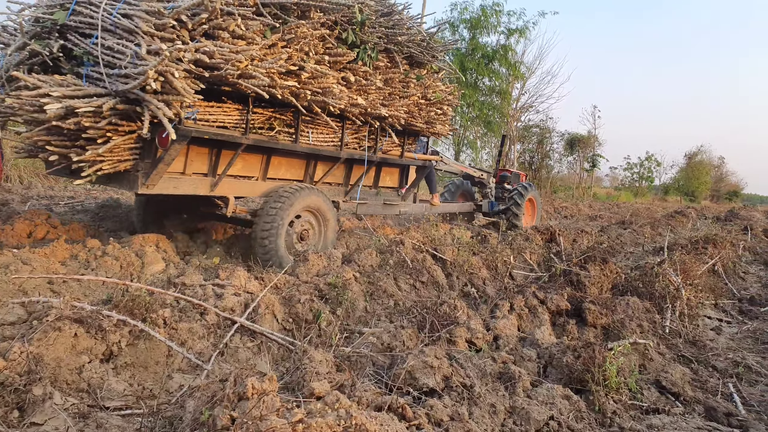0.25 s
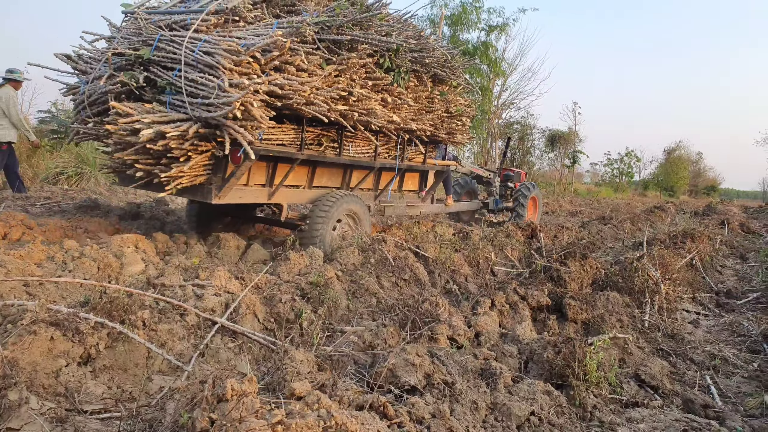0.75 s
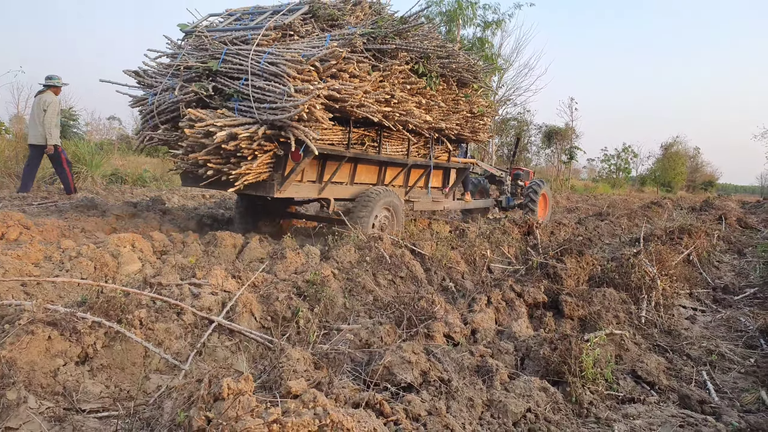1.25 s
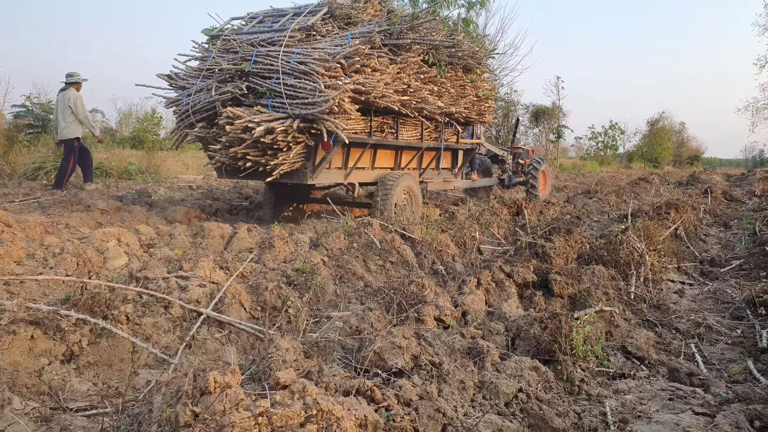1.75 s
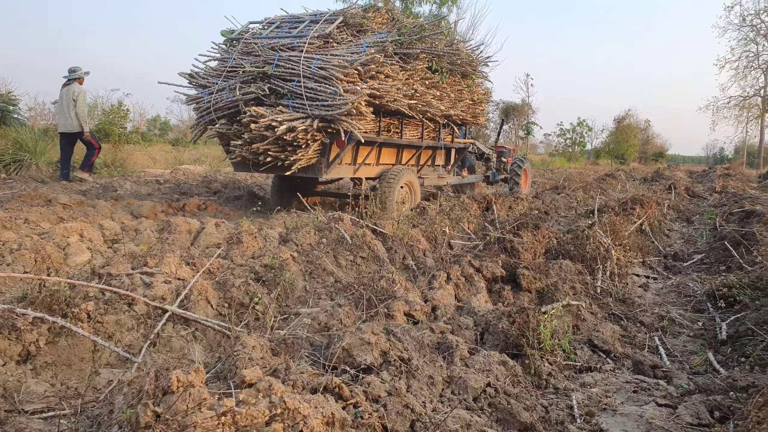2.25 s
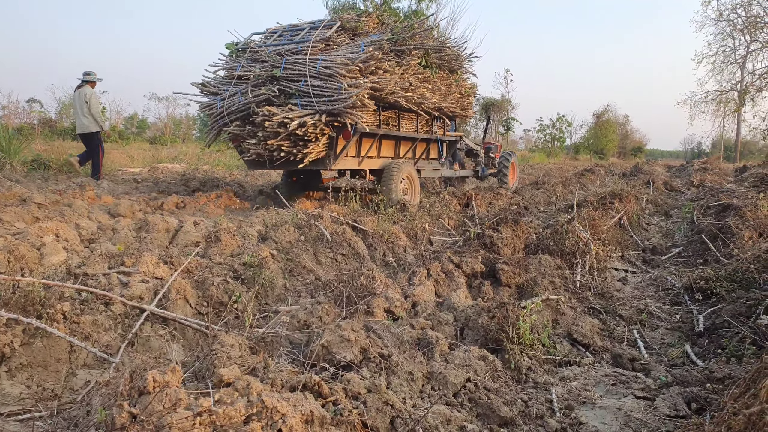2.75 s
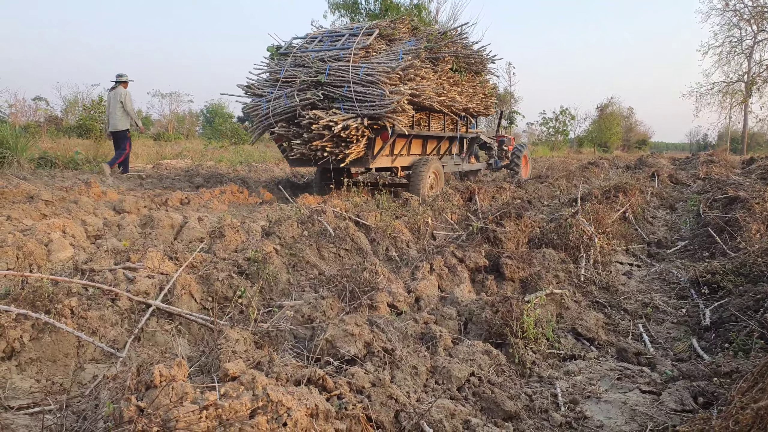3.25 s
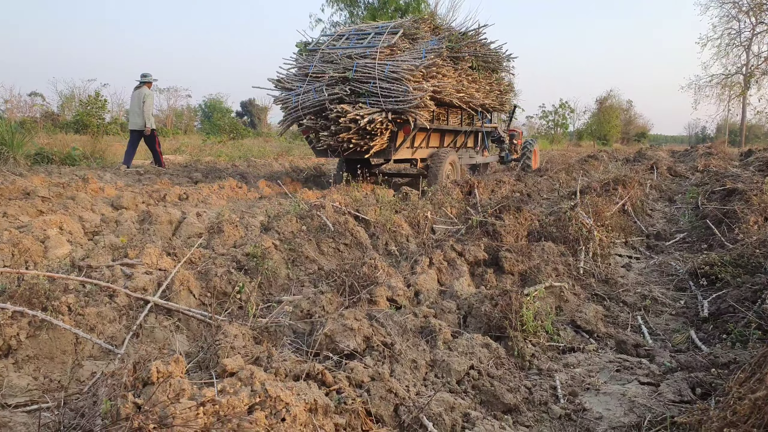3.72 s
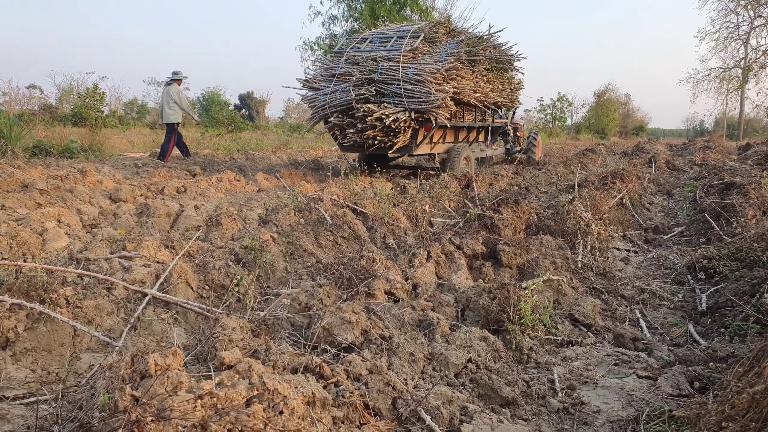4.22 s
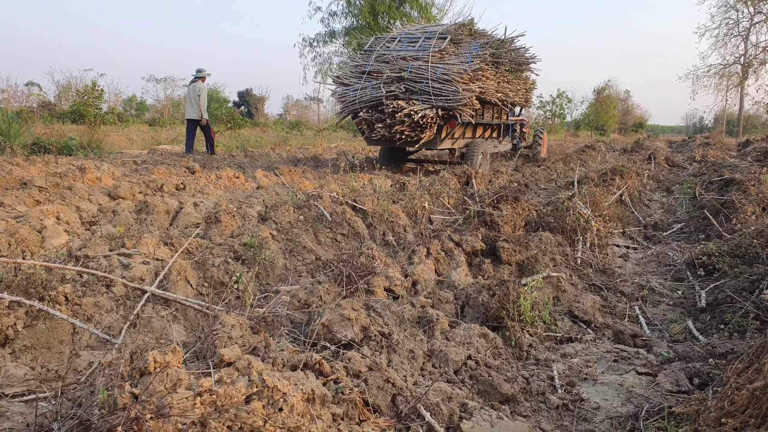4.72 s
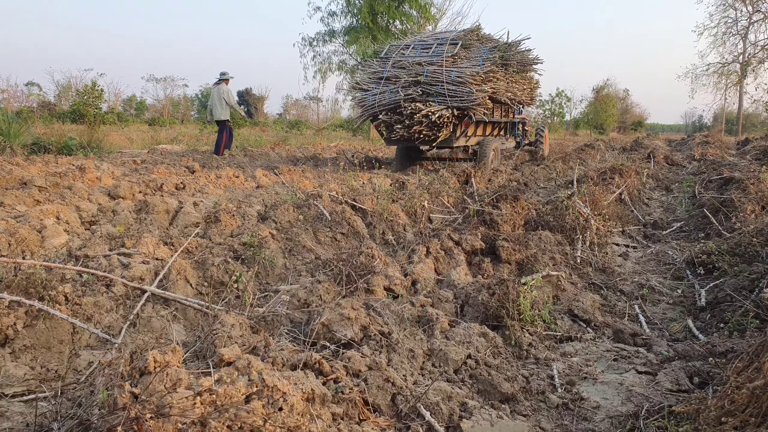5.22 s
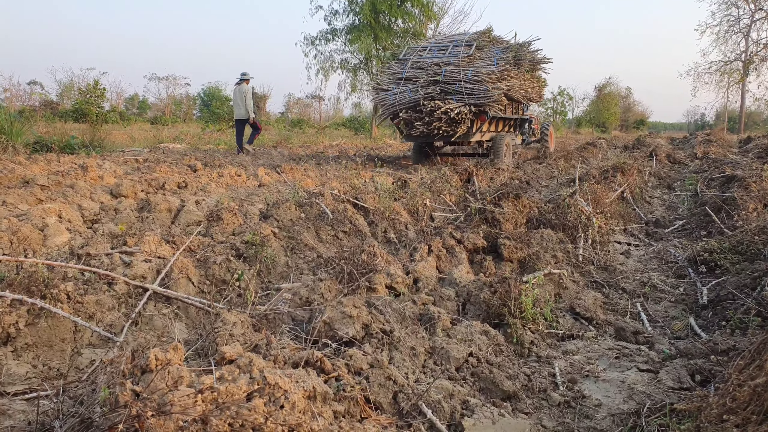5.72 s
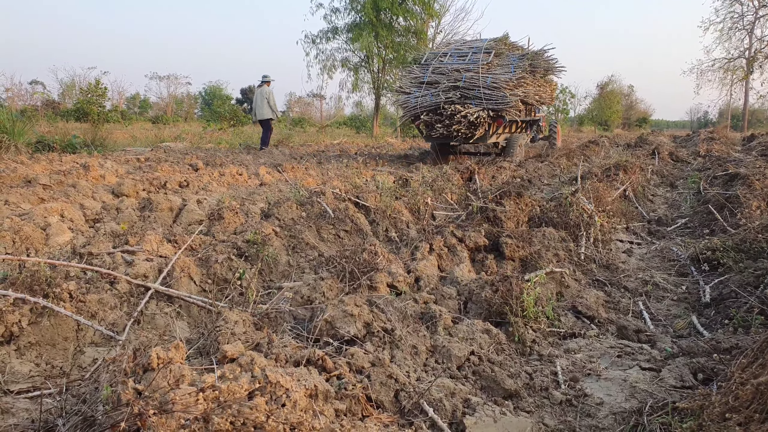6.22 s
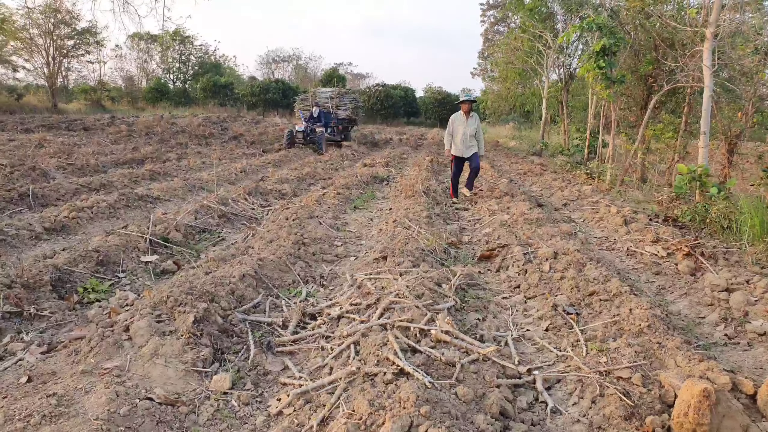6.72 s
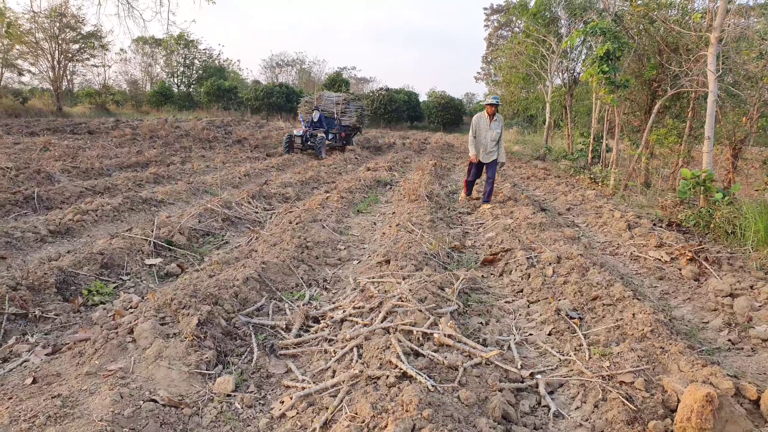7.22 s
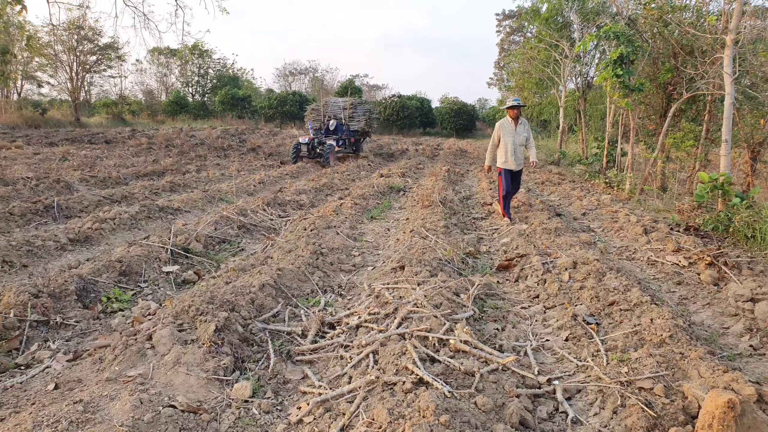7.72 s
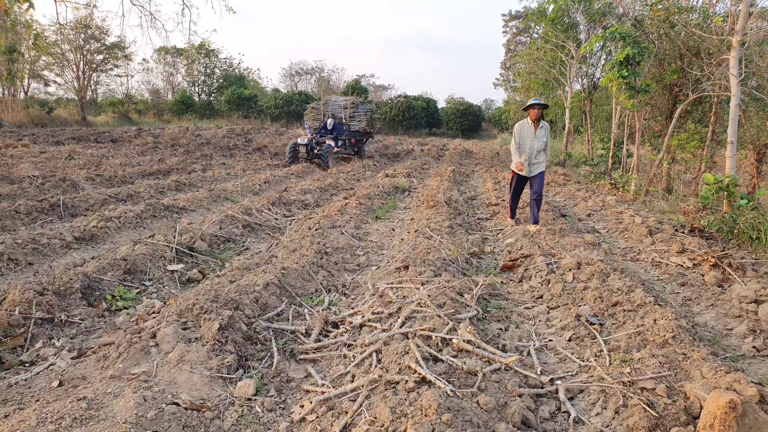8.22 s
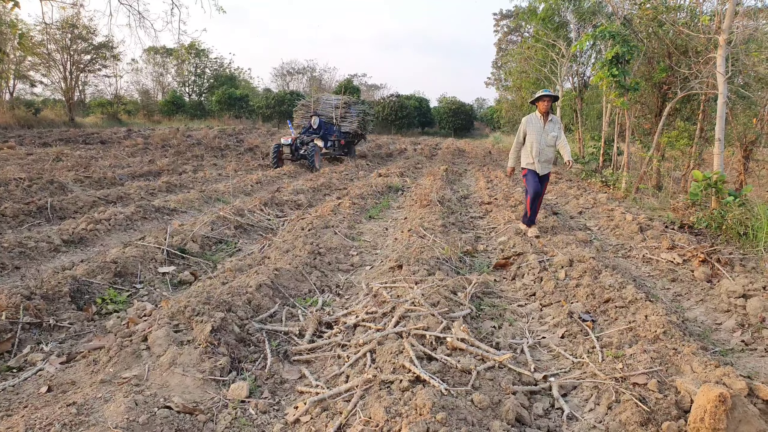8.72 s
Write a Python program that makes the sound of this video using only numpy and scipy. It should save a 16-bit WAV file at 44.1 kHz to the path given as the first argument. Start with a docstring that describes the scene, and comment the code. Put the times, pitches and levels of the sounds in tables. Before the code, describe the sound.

A single-cylinder diesel hand tractor coasts with clacking valves, then pulls hard with loud thumping exhaust and gear whine, before cutting to slower knocking from the front.

```python
"""Diesel hand tractor on ploughed ground

A single-cylinder hand tractor drags a loaded trailer: from behind it coasts, then pulls and moves off, with gears
singing; after a cut it is heard from the front, turning slower. Each engine cycle knocks, blasts into the exhaust
pipe, clacks its valves and leaves the pipe booming. Blows are shaped noise with ringing casing modes; the pipe,
panels and gears are sines; clatter and rumble are coloured noise. Two microphone ports hear it all.
Paired tables hold (behind, front), and view 0 or 1 picks one."""
import sys
import numpy as np
from scipy import signal
from scipy.fft import rfft, irfft, next_fast_len
from scipy.io import wavfile
from scipy.ndimage import map_coordinates

SR = 44100
rng = np.random.default_rng(int(sys.argv[2]) if len(sys.argv) > 2 else 0)


def boost(x):
    """Linear amplitude factor 10**(x/20) for a level x in decibels (scalar or array-like)."""
    u = np.asarray(x, float) / 20
    return 10 ** u


def wav_out(sig):
    """Save sig, one row per channel (or a flat mono array), as 16-bit PCM at SR to the path in sys.argv[1]."""
    wavfile.write(sys.argv[1], SR, np.round(np.clip(np.atleast_2d(sig).T, -1, 1) * 32767).astype(np.int16))


N = 395136  # samples

CUT_S = 6.712  # the listening place jumps from behind to in front
GRIT_DB = 2  # roughness of noise levels
HISS_FROM_HZ = 400  # low edge of the engine's noises
SCATTER_DB = .9  # cycle-to-cycle spread of the main blows


def along(points, hz):
    """Interpolate (Hz, value) points on a log frequency axis."""
    f, v = np.transpose(points)
    return np.interp(np.log(hz + 1), np.log(f + 1), v)


def read(rows, when):
    """Each column after the time, at the given moments."""
    s, *cols = np.transpose(rows)
    return [np.interp(when, s, c) for c in cols]


def wobble(rate):
    """A smooth random curve, rate knots a second."""
    knots = rng.standard_normal(int(N * rate / SR) + 4)
    return map_coordinates(knots, [np.arange(N) * rate / SR])


def lay(starts, shapes):
    """Add each row of shapes into the timeline at its start (s)."""
    # a second of margin at the front holds cycles that begin before time zero
    at = np.round(starts * SR).astype(int)[:, None] + np.arange(shapes.shape[1]) + SR
    return np.bincount(at.ravel(), shapes.ravel(), N + 3 * SR)[SR:SR + N]


# left-right balance of the microphone ports: (frequency [Hz], left over right [dB])
PORT_BALANCE = ([(60, 0.0), (92, 0.0), (140, 0.2), (210, -1.0), (330, -3.5), (500, -1.0), (770, -0.5),
                 (1170, -5.5), (1790, -8.0), (2740, -7.0), (4190, -11.0), (6410, -5.5), (9810, -3.0),
                 (15000, -8.0)], [(60, 0.0), (92, 0.0), (140, 0.0), (210, 0.0), (330, 1.0), (500, -2.0),
                 (770, 0.5), (1170, -2.5), (1790, 1.2), (2740, -3.5), (4190, -8.5), (6410, -8.0),
                 (9810, -4.0), (15000, -5.0)])
# phase between the ports: (frequency [Hz], left leads by [radians])
PORT_LEADS = ([(30, -0.13), (100, -0.13), (200, -0.25), (310, -0.5), (430, 0), (700, -0.2), (780, -0.5),
               (1210, -1.8), (1890, -2.1), (2500, -1.3), (2840, -2.6), (3270, -2.9), (3620, -2.2),
               (4390, -2.9), (5510, -2.6), (7670, -3.6), (8350, -2.5), (11500, -6.2), (16200, -6.8)],
               [(0, 0), (350, 0), (430, -0.4), (540, 0.45), (1120, 0.3), (1460, 1.3), (2670, 0.1),
               (2930, 0.7), (5940, 2.9), (7320, 5.4), (8530, 2.9), (9650, 5.3), (12500, 6.5), (13400, 8.8),
               (14000, 14.8), (15800, 24.3), (16200, 25.3)])
# likeness of noise at the two ports: (frequency [Hz], shared part [0-1])
PORT_SHARED = [(100, .995), (600, .94), (2000, .84), (5000, .74), (12000, .62)]


def ports(a, b, colour, view):
    """Two draws of a sound reach the ports unequal, shifted and partly shared; the ports' mean keeps its level."""
    size = next_fast_len(N + 8192)
    hz = np.fft.rfftfreq(size, 1 / SR)
    a, b = rfft([a, b], size)
    turn = np.arccos(np.clip(along(PORT_SHARED, hz), 0, 1)) / 2
    common, apart = np.cos(turn), np.sin(turn)
    lead = np.interp(hz, *np.transpose(PORT_LEADS[view]))
    # half the difference goes to the left, the opposite half to the right
    port = boost(along(PORT_BALANCE[view], hz) / 2) * np.exp(.5j * lead)
    mean_power = np.abs(common * (port + 1 / port) / 2) ** 2 + np.abs(apart * (port - 1 / port) / 2) ** 2
    pair = [port * (common * a + apart * b), (common * a - apart * b) / port]
    return irfft(colour(hz) / np.sqrt(mean_power) * pair, size)[:, :N]


def hiss(envelope, spectrum, view, from_hz):
    """Noise under an envelope, coloured behind a steep low cut; the colour has an rms gain of 1."""
    def colour(hz):
        """The spectrum with its low cut, levelled."""
        gain = boost(along(spectrum, hz)) / (1 + (from_hz / (hz + 1)) ** 8)
        return gain / np.sqrt(np.mean(gain ** 2))
    return ports(*envelope * rng.standard_normal((2, N)), colour, view)


def struck(modes, levels_db, detune):
    """Rows of dying modes (Hz, t60), one row a blow, each mode at its own strength and pitch offset."""
    t = np.arange(SR // 8) / SR
    hz, t60 = np.transpose(modes)
    out = np.zeros((len(levels_db), len(t)))
    for k in range(len(hz)):
        fade = boost(levels_db[:, [k]] - 60 * t / t60[k])
        out += fade * np.sin(2 * np.pi * hz[k] * (1 + detune[:, [k]]) * t)
    return out * (1 - np.exp(-t / 0.0029))  # soft onset


# engine speed, as the moments of every sixth valve change behind, every fourth in front: (time [s])
VALVE_CHANGES = (([-0.361, 0.0046, 0.3888, 0.7967, 1.2186, 1.6627, 2.1146, 2.5589, 2.9869, 3.4037, 3.814,
                  4.2227, 4.6193, 5.0079, 5.389, 5.7668, 6.1419, 6.5075, 6.8745], [6.272, 6.6848, 7.1024,
                  7.5199, 7.9455, 8.3629, 8.774, 9.178, 9.575]))
# engine cycles between those moments: [cycles]
CYCLES_APART = (6, 4)


def cycle_times(view):
    """The moment of every valve change, on a smooth curve through the marked ones."""
    s = np.array(VALVE_CHANGES[view])
    place = np.arange((len(s) - 1) * CYCLES_APART[view] + 1) / CYCLES_APART[view]

    def steady(k):
        """The moments if the engine turned evenly."""
        return s[0] + (s[-1] - s[0]) * k / (len(s) - 1)
    drift = s - steady(np.arange(len(s)))
    return map_coordinates(drift, [place], mode="nearest") + steady(place)


# what the engine does: (time [s], load [0-1], far or screened by the trailer [0-1])
DRIVE = (([(.05, .3, 0), (.25, .1, 0), (.74, 0.06, 0.1), (1, 0, 0.16), (1.45, 0, 0.07), (1.6, 0.73, 0),
          (1.76, 0.93, 0), (2.3, 0.97, 0.02), (2.55, 1, 0.03), (2.95, 1, 0.01), (3.3, 0.93, 0.1),
          (3.8, 0.94, 0.15), (4.15, 1, 0), (4.45, 0.98, 0.41), (5, 1, 0.4), (5.5, 0.98, 0.67), (6, 1, 0.73),
          (6.4, 0.87, 0.86), (6.7, 0.95, 0.7)], [(6.75, 0.33, 0.88), (7.3, 0.43, 0.38), (7.8, 0.71, 0.23),
          (8.4, 0.6, 0.3), (8.96, 0.98, 0)]))
# engine speed at which the laws need no correction: [cycles a second]
USUAL_SPEED = (14.5, 9.5)


def obey(laws, view, times):
    """Each law's value at every cycle, from load, speed and hiding."""
    load, hidden = read(DRIVE[view], times)
    faster = 1 / np.gradient(times) - USUAL_SPEED[view]
    return [light + (full - light) * load + per_speed * faster + cover * hidden
            for light, full, per_speed, cover in laws[view]]


# cycles that stand out, by a louder blast or, early on while coasting, a louder valve clack;
# before each sound takes its share: (time [s], extra level [dB])
STRONG_CYCLES = [(.13, 2.5), (.195, 3), (.26, 2.5), (.325, 3), (.59, 2), (.73, 2.5), (2.04, 3), (2.115, 2),
                 (2.34, 2.5), (2.485, 1), (2.56, 2), (2.63, 2), (2.705, 3), (2.775, 3), (2.845, 2),
                 (2.915, 0.5), (3.055, 0.5), (3.405, 2), (3.68, 2), (3.745, 3), (4.02, 1), (4.085, 2),
                 (4.88, 2), (4.945, 2), (5.07, 3.5), (5.77, 1), (6.79, 3), (7.63, 3), (7.84, 2.5),
                 (8.26, 2), (8.77, 2.5)]


def standing_out(times):
    """Extra dB of each cycle: each marked moment goes to the cycle nearest it."""
    s, extra_db = np.transpose(STRONG_CYCLES)
    gap = np.abs(times[:, None] - s)
    nearest = (gap == gap.min(axis=0)) & (gap < np.gradient(times)[:, None])
    return nearest @ extra_db


# laws, each (light load, full load, change per extra cycle a second, change when hidden)
# blowdown driving the open pipe, rows: lead [ms], pipe pitch [Hz], boom [dB], pressure front [dB]
EXHAUST = (([(23, 13, -0.45, -1.3), (67.5, 87.5, 2, 3), (-19, -7.5, 1, -4.5), (-33, -18, 0, -22)],
            [(17, 18.5, -.1, 0.2), (78, 74.5, .1, -2), (-16, -12, .1, -2), (-30, -21, .1, -12)]))
# pipe once the valve shuts, rows: lag [ms], ring pitch [Hz], ring [dB], swell [0-1], t60 [s], snap [dB]
SHUT = (([(8.5, 8, -0.0032, 0.4), (89.5, 93, 0.64, 2), (-5, -7.5, .5, 2.7), (.85, -0.4, -.15, 2.24),
         (.16, 0.1558, -.015, 0.085), (-14.5, -21, 0.09, -10)], [(6.5, 6.5, .1, 0.9), (101, 97, .1, 4.5),
         (-11, -9.5, .1, -5), (.15, 0.24, .01, 0.65), (.16, .17, .01, -.02), (-50, -52, .1, 18)]))
EXTRA_IN_PIPE = 0.32  # share of a strong cycle's extra dB in boom and ring, twice that in the snap


def pipe(view, times):
    """The blowdown swings the open pipe; the shutting valve snaps and restarts it at another pitch."""
    lead, pipe_hz, boom_db, front_db = np.array(obey(EXHAUST, view, times))[..., None]
    lag, ring_hz, ring_db, swell, t60, snap_db = np.array(obey(SHUT, view, times))[..., None]
    extra_db = EXTRA_IN_PIPE * standing_out(times)[:, None]
    t = np.arange(-SR // 32, SR // 4) / SR
    opened, closed = t + lead / 1000, t - lag / 1000  # s since the valve opened, shut
    shut = .5 + .5 * np.tanh(closed / .0014)
    build = 1 - np.exp(-np.maximum(opened, 0) / 0.0036)
    boom = -np.sin(2 * np.pi * pipe_hz * opened) * build * (1 - shut)
    front = np.maximum(opened + 0.0036, 0) / 0.0015
    after = np.maximum(closed, 0)
    swelling = 1 - np.clip(swell, 0, 1) * np.exp(-after / .012)
    fade = swelling * boost(-60 * after / np.maximum(t60, .05))
    ring = np.sin(2 * np.pi * ring_hz * closed + 2.3) * shut * fade
    snap = (closed - TIMING[view][5] / 1000) / 0.00093
    wave = boost(boom_db + extra_db) * boom + boost(front_db) * front * np.exp(1 - front)
    wave += boost(ring_db + extra_db) * ring
    wave -= boost(snap_db + 2 * extra_db) * snap * np.exp(.5 - snap ** 2 / 2)
    return lay(times + t[0], wave)


# higher pipe modes: (frequency [Hz], opening level over boom [dB], shutting level over ring [dB], t60 [s])
OVERTONES = (([(168.7, -12.5, -15.5, 0.071), (208.7, -20, -17, 0.073), (257, -18.5, -17, 0.05),
              (319.5, -17.5, -25, 0.055)], [(156, -21.5, -20, 0.078), (217, -17.5, -7.5, 0.048),
              (253, -37, -9.5, 0.06), (397.5, -23.5, -43, 0.17)]))


def overtones(view, times):
    """Both valve movements kick the pipe's higher modes at the same pitch every cycle, so they stay pitched."""
    lead, _, boom_db, _ = obey(EXHAUST, view, times)
    lag, _, ring_db, *_ = obey(SHUT, view, times)
    hz, open_db, shut_db, t60 = np.transpose(OVERTONES[view])
    modes = np.transpose([hz, t60])
    chance_db = rng.standard_normal((len(times), 2, len(hz)))
    in_tune = np.zeros((len(times), len(hz)))
    opening = struck(modes, boom_db[:, None] + open_db + chance_db[:, 0], in_tune)
    shutting = struck(modes, ring_db[:, None] + shut_db + chance_db[:, 1], in_tune)
    return lay(times - lead / 1000, opening) - lay(times + lag / 1000, shutting)


# sheet-metal panels kept humming by the shaking: (frequency [Hz], light load level [dB], full load level [dB])
PANELS = ([(471.4, -46, -60), (637, -49, -62), (813, -49.5, -62), (871, -49, -50.5)], [(524, -57, -56),
           (872, -47, -47)])


def panels(view):
    """Shaken sheet metal hums in narrow tones of fixed pitch that waver in strength."""
    t = np.arange(N) / SR
    load = np.clip(read(DRIVE[view], t)[0], 0, 1)
    total = np.zeros(N)
    for hz, light, full in PANELS[view]:
        level_db = light + (full - light) * load + 4 * wobble(13)
        total += boost(level_db) * np.sqrt(2) * np.sin(2 * np.pi * hz * t + .8 * wobble(12))
    return total


# casing modes rung by every blow: (frequency [Hz], relative level [dB], t60 [s])
CASING = (([(480, -21.5, .16), (645, -19, 0.17), (816, -19.5, 0.051), (887, -22.5, 0.13),
           (1315, -6.5, 0.062), (1417, -16, 0.11), (1802, -9.5, 0.06), (2486, -3.5, 0.016),
           (3030, -4, 0.026), (3880, -18.5, 0.037)], [(716, 0, 0.041), (858, -6.5, 0.092),
           (944, -13, 0.053), (1231, -6.5, 0.12), (1470, -11, 0.16), (1655, -3.5, 0.081),
           (2665, -0.5, 0.027), (3070, -4.5, 0.064), (3990, -7, 0.072)]))


def bursts(starts, level_db, shape, spectrum, view, scatter_db, casing_db):
    """One blow a cycle: a gritty crack with a longer tail, and the casing ringing at new strengths."""
    attack_ms, t60, tail_db, tail_t60 = shape
    t = np.arange(SR // 6) / SR
    rise = np.sin(np.pi / 2 * np.clip(t * 1000 / attack_ms, 0, 1)) ** 2
    chance = rng.standard_normal((len(starts), 2))
    starts = starts + .0004 * chance[:, 0]
    level_db = (level_db + scatter_db * chance[:, 1])[:, None]
    blow = rise * (boost(-60 * t / t60) + boost(tail_db - 60 * t / tail_t60))
    envelope = lay(starts, boost(level_db) * blow) * boost(GRIT_DB * wobble(450))
    crack = hiss(envelope, spectrum, view, HISS_FROM_HZ)
    hz, mode_db, life = np.transpose(CASING[view])
    luck = rng.standard_normal((len(starts), 4, len(hz)))
    spread_db, detune = 2.2 * luck[:, :2], .014 * luck[:, 2:]

    def ring(k):
        """One of two draws of the casing's ringing."""
        strength_db = level_db + casing_db + mode_db + spread_db[:, k]
        return lay(starts, struck(np.transpose([hz, life]), strength_db, detune[:, k]))
    return crack + ports(ring(0), ring(1), np.ones_like, view)


# levels of each cycle's noises, rows: combustion knock, gas blast, valve clack, running clatter [dB]
# columns: (light load, full load, change per extra cycle a second, change when hidden)
BURST_LEVELS = (([(-52, -31, 0.98, 1.9), (-49, -13.5, -0.042, -12.5), (-15.3, -23.5, .3, -6),
                 (-35.5, -36, 0.39, -1.4)], [(-23, -22, .1, -1.2), (-25, -20, .1, -1.5),
                 (-32.5, -33, .1, -7.5), (-40, -37.5, .1, -1.6)]))
# noise colours before levelling and the low cut: (frequency [Hz], relative density [dB per Hz])
KNOCK = (([(180, -26), (300, -2), (571, -7.5), (1460, -4), (2070, -13), (2520, -8), (2980, -10),
          (3630, -13), (5210, -32), (7620, -28), (8560, -52), (14300, -36), (15500, -46)], [(180, -64),
          (300, -27), (439, -44), (953, 5.5), (1200, 0), (1730, 1), (2070, -22), (2690, 0.5), (3180, -14),
          (3510, -15), (3870, -15.5), (5130, -30), (7620, -21.5), (8700, -72), (15500, -50)]))
BLAST = (([(180, -12), (300, -2.5), (620, -2.5), (922, -10), (2280, -3.5), (3130, -5.5), (3750, 0),
          (4490, -11), (5210, -10), (6360, -16.5), (8280, -13.5), (9290, -32.5), (11000, -23),
          (12700, -14.5), (15500, -31)], [(180, -20), (300, -10), (484, -11), (937, 2), (2070, -18.5),
          (3180, -6.5), (4000, -12.5), (4420, -17), (6360, -28), (7250, -19), (9600, -37), (12300, -27.5),
          (15500, -55)]))
CLACK = (([(180, -34), (300, 0), (708, 0), (1030, -6), (1300, 3.5), (1840, -2.5), (2170, -3), (3130, -6),
          (3570, -8), (4280, -4), (4880, -15), (5760, -8.5), (9760, -20), (11900, -13.5), (15500, -24)],
          [(180, -11), (300, -4), (562, -13.5), (953, -4), (1750, -18), (2000, -19), (2440, -11.5),
          (3870, -21), (4350, -27), (4720, -22), (5660, -21.5), (8990, -26), (15500, -37)]))
CLATTER = ([(76, -9), (130, 5.5), (252, 11), (432, -23), (726, -22.5), (1080, -26), (1350, -20),
            (1970, -26.5), (3070, -29), (3900, -29), (6300, -43), (7850, -36.5), (8850, -50),
            (13500, -39.5), (15500, -56)], [(76, -33), (130, -10), (175, 9.5), (257, -13), (487, -25),
            (942, -10.5), (1130, -25), (1650, -16.5), (1970, -21.5), (2670, -16.5), (3130, -18),
            (5060, -28), (9210, -34.5), (12000, -34), (15500, -42)])
# knock, blast, clack, tappet tick: (attack [ms], crack t60 [s], casing tail [dB], tail t60 [s])
SHAPES = (([(3.8, 0.11, -12, 0.4), (2.52, 0.025, -14, 0.12), (3.95, 0.044, -14.5, 0.093),
           (0.52, 0.034, -30, .05)], [(2.1, 0.064, -8, 0.13), (1.55, 0.027, -5, 0.16), (3, 0.057, 0, 0.2),
           (1.5, 0.014, -30, .05)]))
# (knock lead [cycles], blast start [ms], clack start [ms], tick lag [cycles], tick over clatter [dB],
#  snap lag [ms])
TIMING = ((.43, -3, -3, 0.45, -11, 0.091), (.47, -4, -5, 0.29, -2.5, 3.7))
# casing ring over the crack of the knock, for each view: [dB]
KNOCK_RING_DB = (-.5, 2)
# share of a strong cycle's extra dB: (knock, blast, clack)
EXTRA_IN_BURSTS = ((.2, 1, .7), (.9, 1, .9))


def engine(view):
    """All that one engine makes, tied to its cycle: pipe, panels, blows, tappet ticks and clatter."""
    times = cycle_times(view)
    period = np.gradient(times)
    knock_lead, blast_ms, clack_ms, tick_lag, tick_db, _ = TIMING[view]
    *blows_db, clatter_db = obey(BURST_LEVELS, view, times)
    knock_db, blast_db, clack_db = blows_db + np.outer(EXTRA_IN_BURSTS[view], standing_out(times))
    opening = times - obey(EXHAUST, view, times)[0] / 1000
    knock, blast, clack, tick = SHAPES[view]
    pitched = pipe(view, times) + overtones(view, times) + panels(view)
    out = ports(pitched, 0 * pitched, np.ones_like, view)
    out += bursts(times - knock_lead * period, knock_db, knock, KNOCK[view], view, SCATTER_DB,
                  casing_db=KNOCK_RING_DB[view])
    out += bursts(opening + blast_ms / 1000, blast_db, blast, BLAST[view], view, SCATTER_DB, casing_db=-7.5)
    out += bursts(times + clack_ms / 1000, clack_db, clack, CLACK[view], view, SCATTER_DB, casing_db=4.5)
    # the tick borrows the colour of the blast
    out += bursts(times + tick_lag * period, clatter_db + tick_db, tick, BLAST[view], view,
                  scatter_db=3, casing_db=1.5)
    running_db = np.interp(np.arange(N) / SR, times, clatter_db)
    running = boost(running_db + 1.3 * wobble(60) + GRIT_DB * wobble(400))
    return out + hiss(running, CLATTER[view], view, HISS_FROM_HZ)


# gear whine: (time [s], level of each mesh from low to high [dB] x 4)
WHINE = [(1.4, -62, -62, -60, -62), (1.8, -48, -49, -45, -60), (3, -47, -49, -48, -58),
         (4.4, -49, -48, -56, -54), (5.2, -50, -50, -58, -47), (6.7, -51, -54, -60, -45)]
# pitch of each mesh: [tone periods per engine cycle]
GEAR_ORDER = (37.5, 41.5, 52.4, 55.8)


def gears():
    """Gear meshes sing unsteadily at fixed orders of the engine, so they glide with its speed."""
    t = np.arange(N) / SR
    times = cycle_times(0)
    turns = np.interp(t, times, np.arange(len(times)))
    whine = np.zeros(N)
    for order, level_db in zip(GEAR_ORDER, read(WHINE, t)):
        strength = boost(level_db + 1.8 * wobble(25)) * np.sqrt(2)
        whine = whine + strength * np.sin(2 * np.pi * order * turns + 1.0 * wobble(30))
    return whine


# path off the soil: (extra delay at the start [ms], distance gained [share of the first a second], level [dB])
SOIL_PATH = (1.52, 0.098, -15)


def ground(x):
    """Soft soil returns the mid range a moment later, ever sooner as the tractor draws away, so its dip climbs."""
    at = np.arange(N)
    first_ms, gained, level_db = SOIL_PATH
    delay_ms = first_ms / (1 + gained * at / SR)
    mids = signal.sosfiltfilt(signal.butter(2, [220, 1500], "band", fs=SR, output="sos"), x)
    late = np.array([np.interp(at - delay_ms * SR / 1000, at, side) for side in mids])
    return x + boost(level_db) * late


# ground and air rumble before levelling: (frequency [Hz], relative density [dB per Hz])
RUMBLE = [(12, -30), (25, -17), (50, -0.5), (130, -0.5), (220, -12), (330, -11), (500, -120)]


def low_rumble():
    """Ground and air rumble: low noise of slightly wavering level, scaled to one overall rms."""
    rumble = hiss(boost(0.7 * wobble(17)), RUMBLE, 0, 15)
    return boost(-34.5) * rumble / np.sqrt(np.mean(rumble ** 2) + 1e-20)


# treble level for each view: (in the open [dB], change when hidden [dB])
TREBLE = ((3, -7.5), (1.5, -2.5))


def air(tractor, front):
    """Distance and the trailer's cover change the level above 8 kHz."""
    t = np.arange(N) / SR
    behind_db, front_db = (clear + cover * read(rows, t)[1] for (clear, cover), rows in zip(TREBLE, DRIVE))
    top = signal.sosfiltfilt(signal.butter(2, 8000, "high", fs=SR, output="sos"), tractor)
    return tractor + (boost((1 - front) * behind_db + front * front_db) - 1) * top


def scene():
    """Behind the tractor up to the cut, in front of it after, with rumble throughout."""
    t = np.arange(N) / SR
    front = np.clip((t - CUT_S) / 0.024 + .5, 0, 1)  # 24 ms crossfade
    tractor = (1 - front) * ground(engine(0) + gears()) + front * engine(1)
    return air(tractor, front) + low_rumble()


def top_cut(x):
    """Nothing passes above the cut-off."""
    return signal.sosfilt(signal.butter(12, 16650, fs=SR, output="sos"), x)


def record(dry):
    """The microphone's input stage rounds off the highest peaks."""
    rounded = dry / (1 + np.abs(dry / .97) ** 8) ** (1 / 8)
    return top_cut(rounded)


dry = scene()
out = record(dry)
wav_out(out)
```